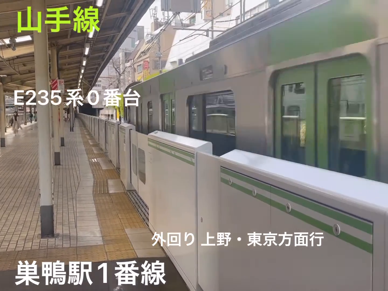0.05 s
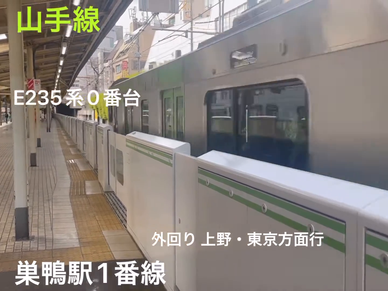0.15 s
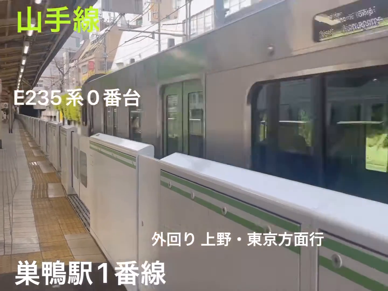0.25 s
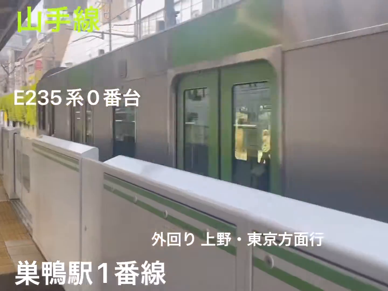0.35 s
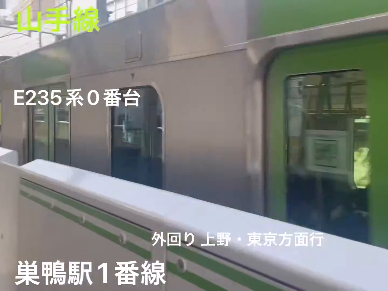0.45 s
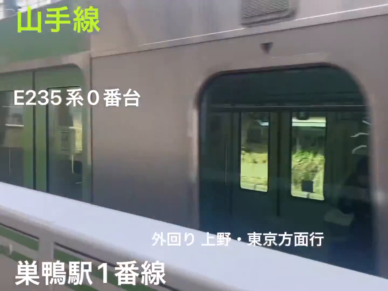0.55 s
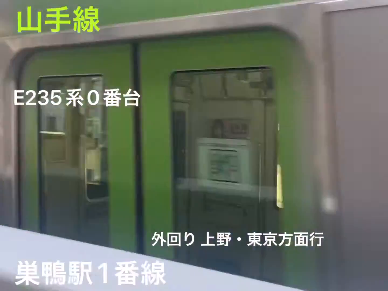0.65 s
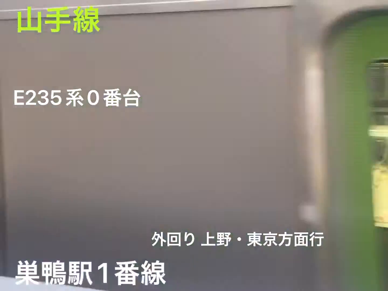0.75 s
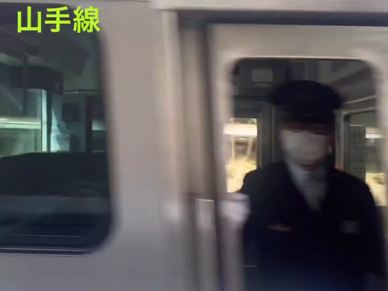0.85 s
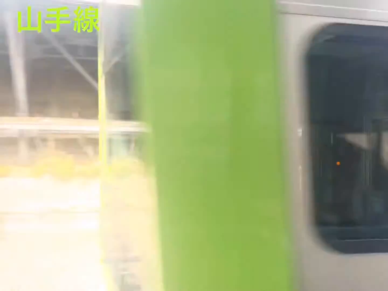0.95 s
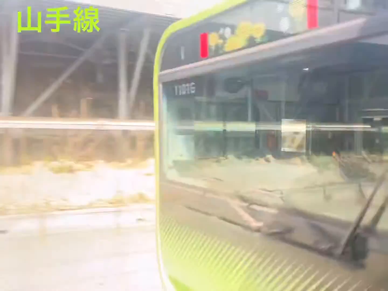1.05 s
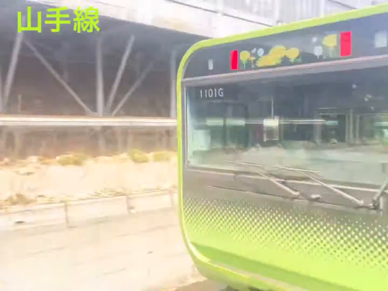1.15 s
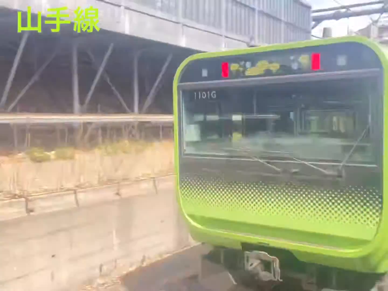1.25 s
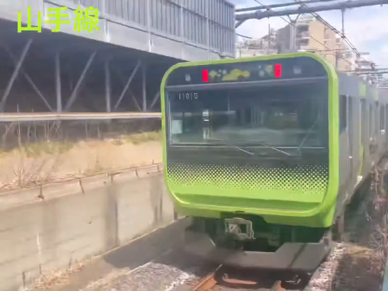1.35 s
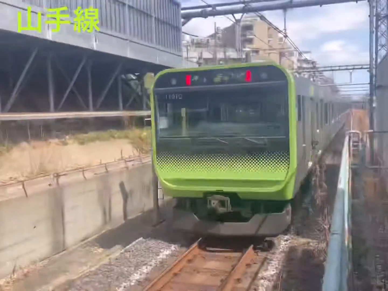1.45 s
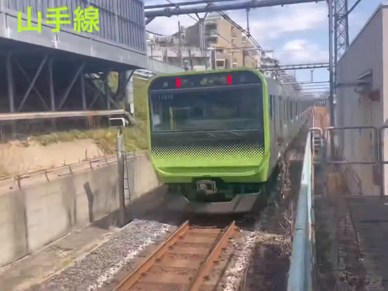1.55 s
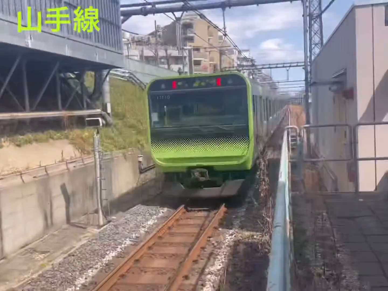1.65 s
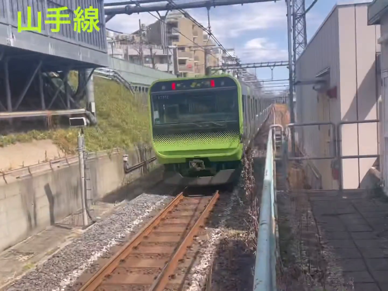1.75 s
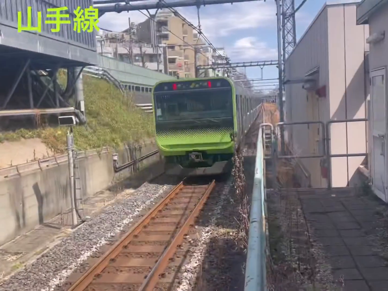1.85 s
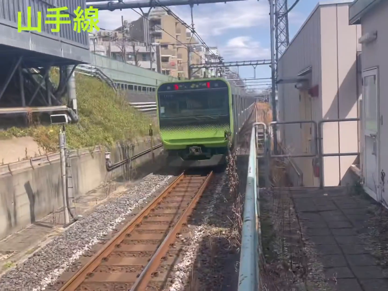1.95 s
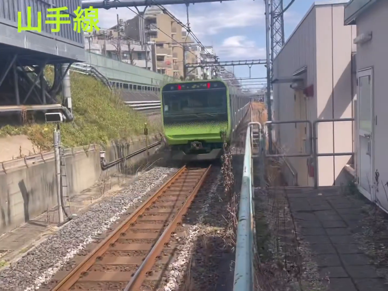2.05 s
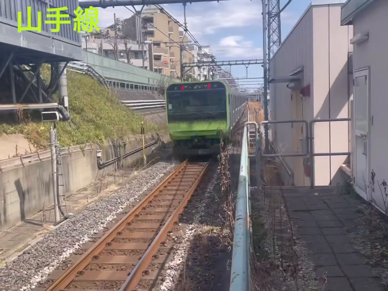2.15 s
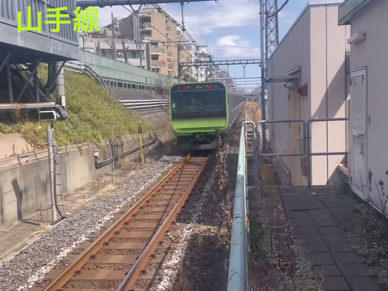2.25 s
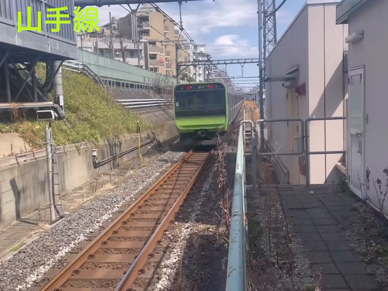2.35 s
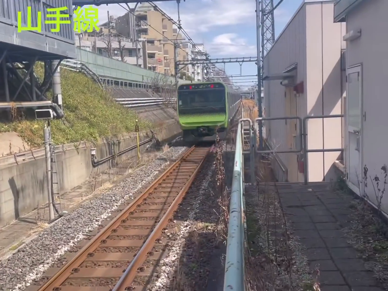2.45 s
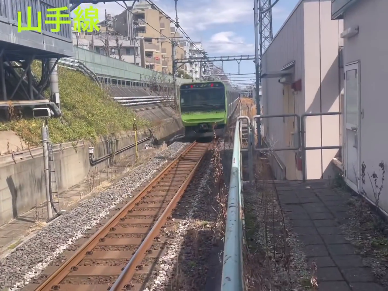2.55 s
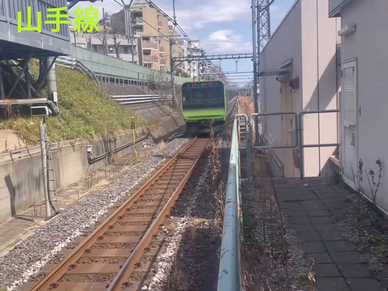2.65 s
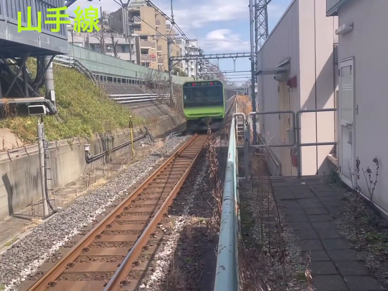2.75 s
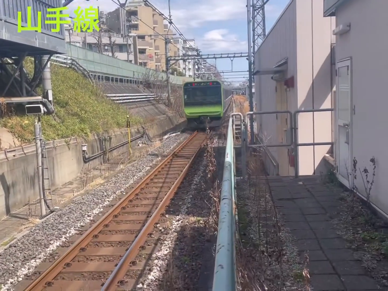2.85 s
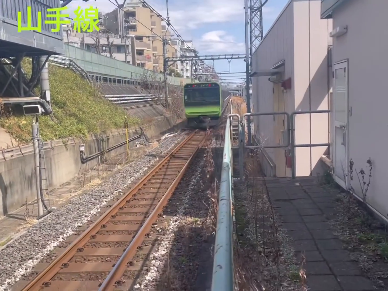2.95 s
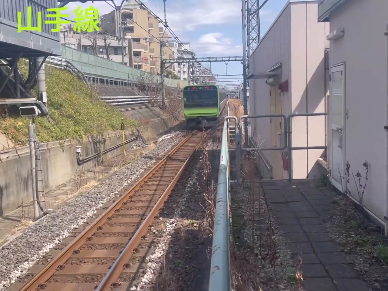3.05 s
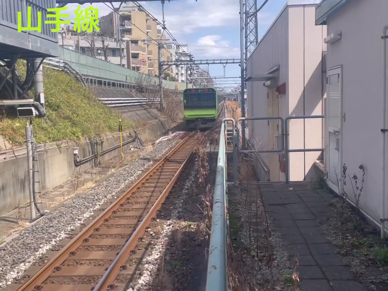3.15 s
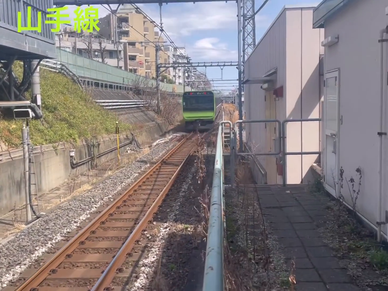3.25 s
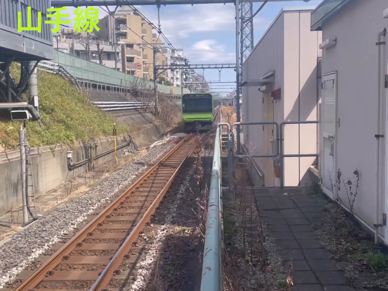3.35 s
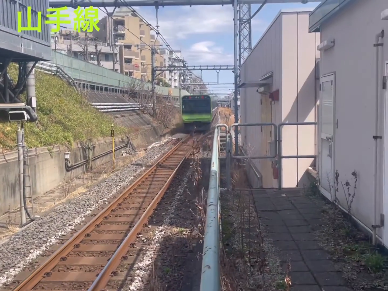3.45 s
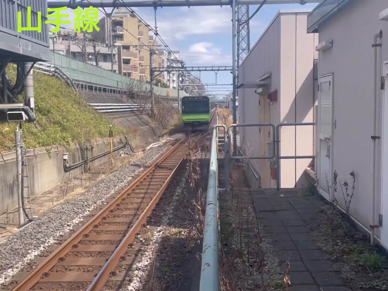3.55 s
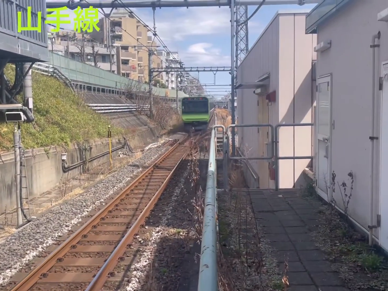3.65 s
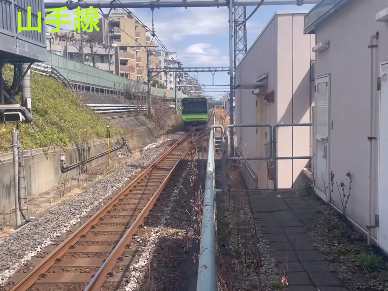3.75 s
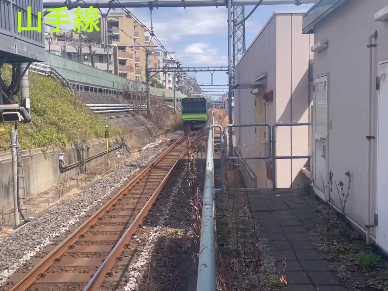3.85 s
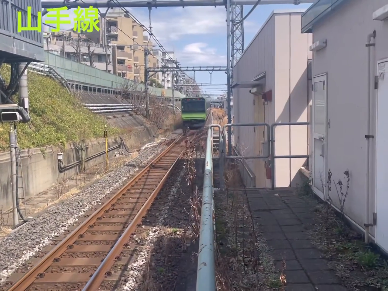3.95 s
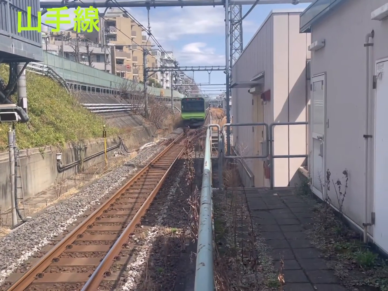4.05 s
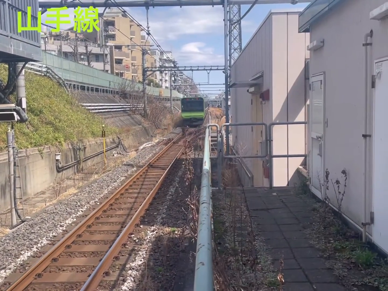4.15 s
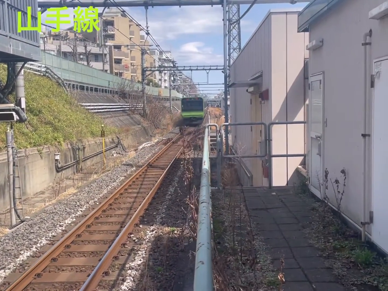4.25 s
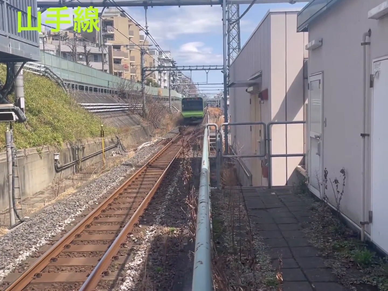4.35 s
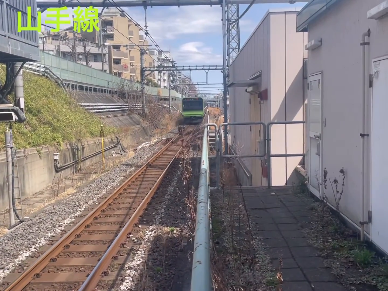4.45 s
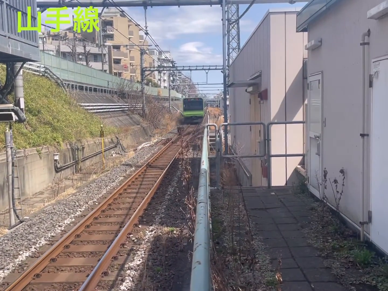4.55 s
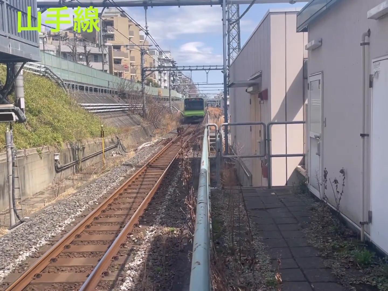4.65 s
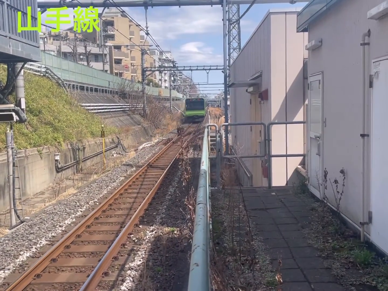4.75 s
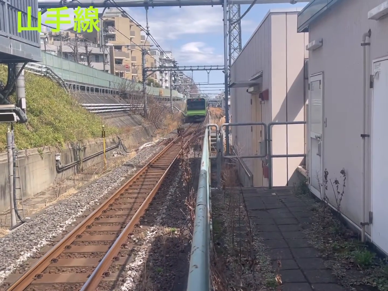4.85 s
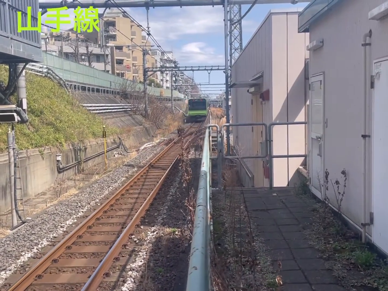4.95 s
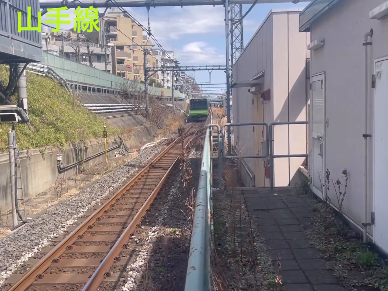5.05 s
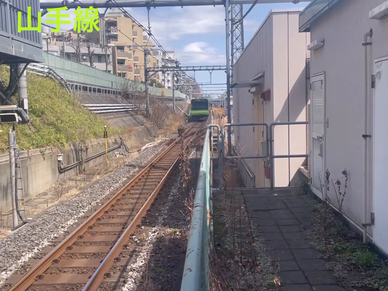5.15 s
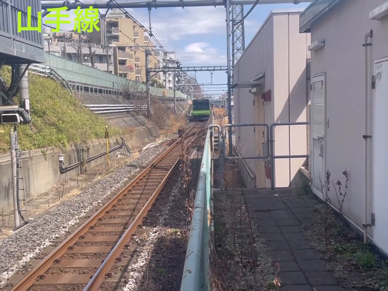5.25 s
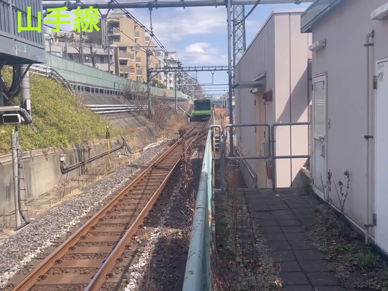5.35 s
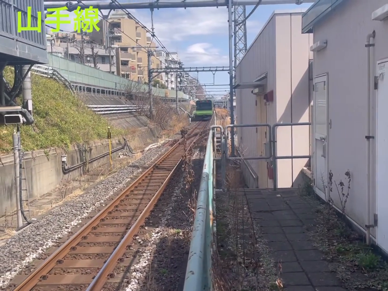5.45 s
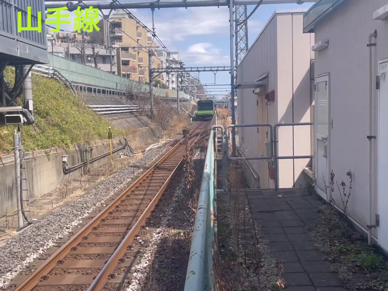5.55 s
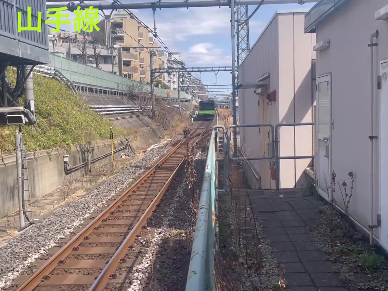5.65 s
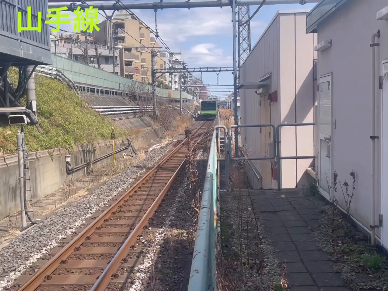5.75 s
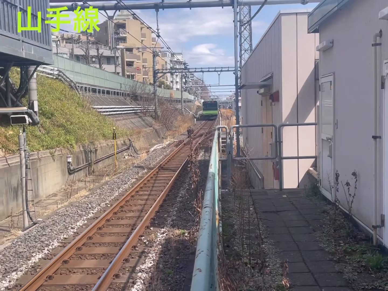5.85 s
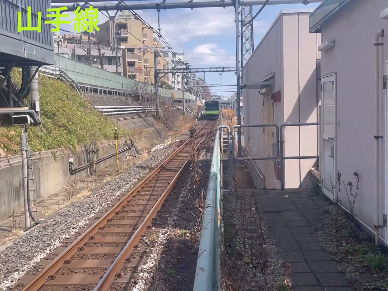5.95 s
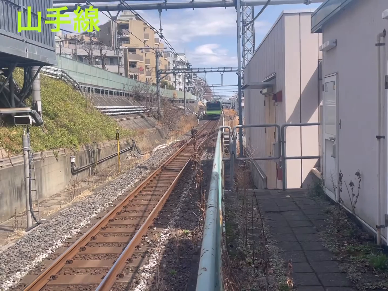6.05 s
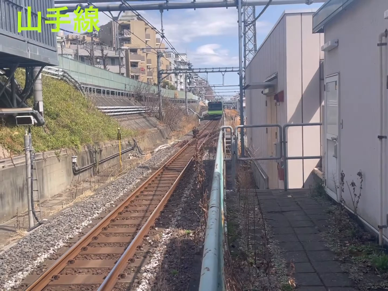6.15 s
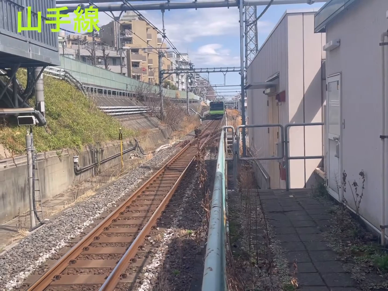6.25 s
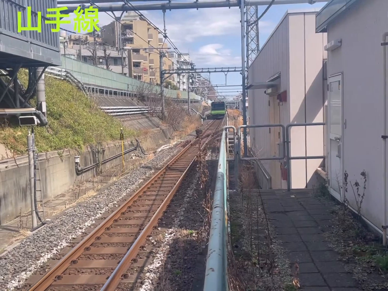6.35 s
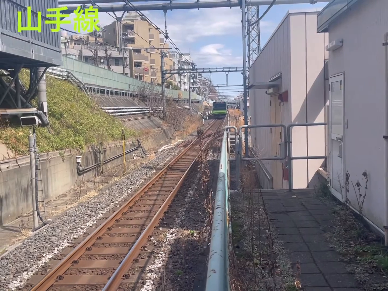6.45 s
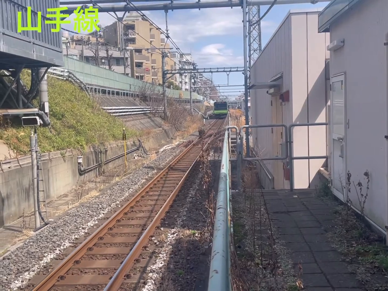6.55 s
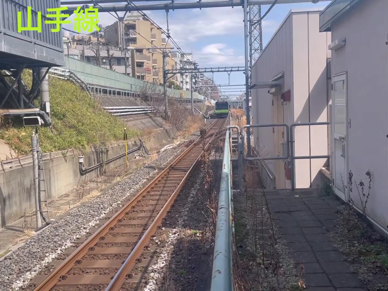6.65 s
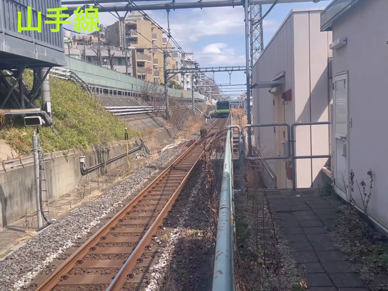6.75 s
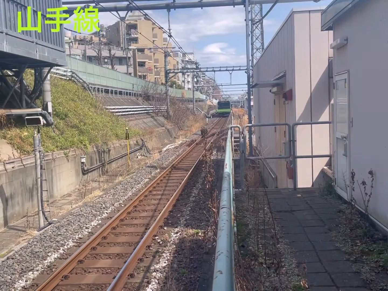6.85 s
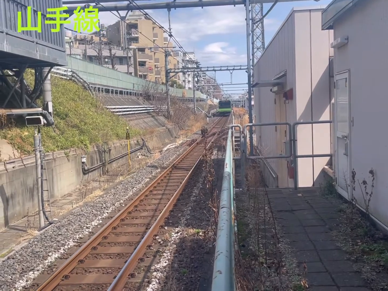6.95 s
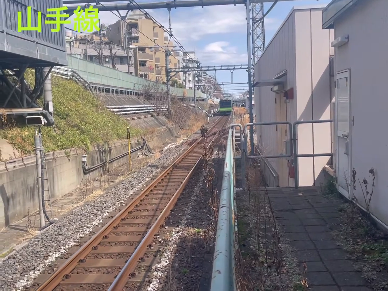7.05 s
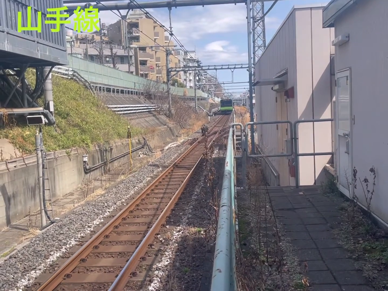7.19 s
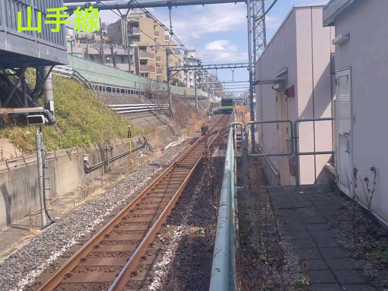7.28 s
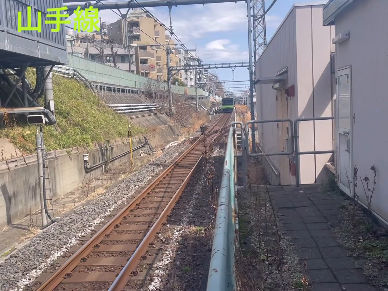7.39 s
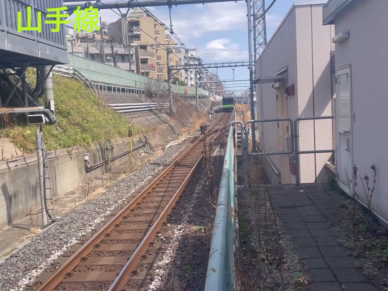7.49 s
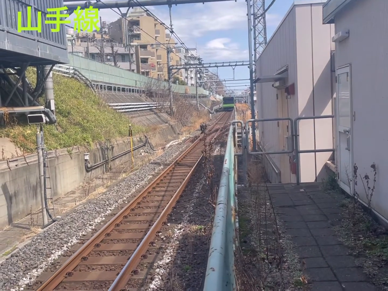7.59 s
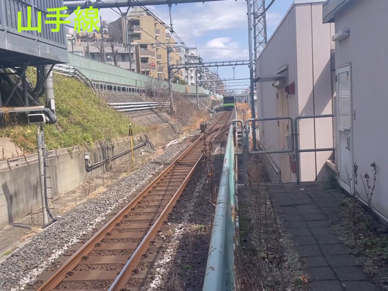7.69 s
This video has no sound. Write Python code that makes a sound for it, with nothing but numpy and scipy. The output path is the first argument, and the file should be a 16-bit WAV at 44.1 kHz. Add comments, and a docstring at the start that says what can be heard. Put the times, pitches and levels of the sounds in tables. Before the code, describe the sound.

From the end of a station platform, an electric train is heard passing several metres away, wide and loud, its wheels roaring and its running gear humming. After a brief thin squeal from the last wheels, a run of thumps, rail rings and a few clacks echoes lightly off the cutting walls. The rumble and whine grow narrower, lower and more distant, fading toward a low town drone and faint hiss.

```python
"""An electric train's last car rolls past the end of a platform, 8 m off, and away down a cutting.
Rough wheels on rough rails make a rumble and roar with a faint hiss above, and the running gear sings
in fuzzy lines, lower once it recedes. At rail joints the axles thump, ring the rail and clack.
Behind lie a low town drone and faint microphone hiss. From the platform, a camera's two microphone
ports hear the train wide while it is alongside and narrow once only its tail is in view."""
import sys
import numpy as np
from scipy import signal
from scipy.fft import rfft, irfft, next_fast_len
from scipy.io import wavfile
from scipy.ndimage import uniform_filter1d, map_coordinates

SR = 44100
rng = np.random.default_rng(int(sys.argv[2]) if len(sys.argv) > 2 else 0)


def wrap_up_sound(samples):
    """Save the sound to the file named by the first command line argument, as 16-bit audio."""
    columns = np.atleast_2d(samples).T
    # keep every value between -1 and 1, then stretch to whole-number steps
    tamed = np.clip(columns, -1, 1)
    steps = np.round(tamed * 32767).astype(np.int16)
    wavfile.write(sys.argv[1], SR, steps)


N = 340452

# rolling noise at the platform (time [s], ground rumble [dB], track boom [dB], rail roar [dB])
ROLLING_LEVELS = [(0, -30, -30, -27), (.2, -26.5, -27, -25.5), (.4, -34.5, -30.5, -25),
                  (.55, -33.5, -27.5, -25.5), (.68, -37, -28.5, -26.5), (.85, -37, -27, -28.5),
                  (1.1, -32.5, -27, -27.5), (1.5, -32, -32, -27), (1.75, -35, -30.5, -28.5),
                  (2.15, -36, -26, -34.5), (2.5, -34.5, -31, -29.5), (2.65, -46, -28, -29.5),
                  (2.8, -40, -22.5, -32.5), (3.05, -38, -27, -41), (3.3, -37, -31.5, -36.5),
                  (3.55, -27.5, -31, -42), (3.72, -40, -36, -42.5), (3.9, -38, -31, -39),
                  (4.05, -34, -32, -40), (4.2, -38, -36, -41.5), (4.4, -41.5, -39.5, -41),
                  (4.7, -37.5, -42, -41.5), (4.95, -32.5, -45.5, -44.5), (5.12, -39, -47, -47.5),
                  (5.3, -40.5, -49.5, -47.5), (5.7, -44, -46, -44), (6.1, -51, -49, -48.5),
                  (6.3, -45, -48, -47.5), (6.6, -43, -50, -48), (6.8, -48, -51.5, -49),
                  (7.1, -46, -50, -48.5), (7.4, -44, -51, -50), (7.72, -43, -51, -52)]
# colours of the rolling noise, deepest first (frequency [Hz], relative density [dB])
RUMBLE_SPECTRUM = [(25, -17), (45, 4), (65, 5.5), (100, -0.5), (150, -10.5), (250, -33), (500, -120)]
BOOM_SPECTRUM = [(30, -98), (60, -15.5), (120, -6), (200, -3), (290, -3), (330, -3), (380, -8.5),
                 (450, -19.5), (700, -48), (1400, -120)]
ROAR_SPECTRUM = [(150, -100), (300, -36), (480, 2), (600, -0.5), (760, 0.5), (900, -5.5), (1000, -10),
                 (1500, -17.5), (2400, -56), (5000, -120)]
HISS_SPECTRUM = [(450, -100), (900, -25), (1200, -11), (1900, -2), (2450, -7), (3300, -10.5), (5500, -14),
                 (8000, -21), (11000, -40), (16000, -98)]
AIR_SPECTRUM = [(2000, -96), (5000, -36), (7500, -1.5), (10000, -1.5), (13000, -6.5), (15000, -17),
                (15700, -24)]

# resonances of wheels, rails and car body, heard close by and from down the cutting
# (frequency [Hz], near width [Hz], near gain [dB], far width [Hz], far gain [dB])
BODY_LINE = [(293, 92, 0, 200, 0)]
LOW_LINES = [(444.5, 24.7, 0, 33, -11), (451.6, 25, -20, 26, 0)]
MIDDLE_LINES = [(879, 42, 11, 137, -7), (914, 30, -4, 22, 0), (857, 26, -4, 56, -2.5)]
UPPER_MID_LINES = [(1331, 25, 0, 68, -5), (1362, 60, -14, 57, 0)]
HIGH_LINES = [(1774, 48, 0.5, 93, -3.5), (2150, 160, 1, 91, 0.5), (2260, 100, -12.5, 95, -3.5)]
WHINE_LINES = [(2630, 90, 5.5, 43, -20), (2670, 85, -10, 50, 3.5), (2830, 340, -5, 430, -5.5)]
APPROACH_LINE = [(2722, 130, 0, 110, 0)]
TOP_LINES = [(3910, 300, -5, 310, 0), (4440, 110, -6, 62, -9)]
SQUEAL_LINES = [(4890, 120, 1, 130, 0), (5300, 98, -8, 110, -9)]
# how loudly they sing (time [s], low lines [dB], middle lines [dB], high lines [dB])
SINGING_LEVELS = [(0, -25.5, -26.5, -42.5), (.3, -25.5, -32.5, -42.5), (.45, -21, -32, -42),
                  (.6, -24.5, -32, -46), (.72, -33.5, -30.5, -41.5), (.92, -22.5, -28, -46),
                  (1.05, -28, -21, -39), (1.15, -25.5, -26.5, -44), (1.25, -24, -23, -38),
                  (1.4, -24, -28.5, -40), (1.5, -29.5, -26, -39), (1.62, -30, -32.5, -45),
                  (1.8, -30, -33, -49), (2.2, -30.5, -42, -52.5), (2.4, -28, -36.5, -46.5),
                  (2.56, -37, -44, -48), (2.75, -35.5, -42.5, -52), (2.95, -41.5, -44, -58),
                  (3.2, -40.5, -44, -52.5), (3.5, -42.5, -40.5, -54), (3.8, -44, -39.5, -54),
                  (4.1, -43, -41, -54.5), (4.2, -39, -41.5, -56), (4.32, -41.5, -42, -48.5),
                  (4.6, -44.5, -43, -50), (4.75, -44, -42.5, -53), (5.1, -40, -42.5, -52.5),
                  (5.4, -40.5, -43.5, -55), (5.75, -44.5, -44.5, -57.5), (6.1, -43.5, -45.5, -60),
                  (6.5, -44, -45.5, -59.5), (6.9, -43.5, -46, -61), (7.3, -49, -46.5, -60),
                  (7.72, -48.5, -45.5, -66)]
# the other lines, one table each (time [s], level [dB])
BODY_LEVEL = [(0, -43), (.8, -39), (1.15, -28), (1.75, -27.5), (2.1, -45), (2.8, -34), (3.5, -40.5),
              (4.5, -52), (7.72, -57.5)]  # hollow hum of the car body
UPPER_MID_LEVEL = [(0, -41), (.6, -46), (1.0, -49), (1.15, -40.5), (1.5, -40), (1.9, -46), (2.25, -47.5),
                   (2.5, -54.5), (3.4, -54.5), (4.4, -54.5), (5.4, -55.5), (6.3, -58.5), (7.72, -59)]
WHINE_LEVEL = [(0, -41.5), (.3, -47), (.9, -49), (1.1, -48), (1.22, -37.5), (1.32, -38), (1.45, -36),
               (1.6, -43), (1.78, -59), (2.2, -54.5), (2.45, -51), (3, -58), (3.25, -62), (3.45, -57.5),
               (3.9, -55.5), (4.15, -61), (4.25, -55), (4.5, -54), (4.7, -54.5), (5.05, -53.5),
               (5.25, -58.5), (5.85, -59), (6.2, -62), (7.72, -78)]  # metallic whine
APPROACH_LEVEL = [(0, -40), (.2, -50), (.4, -44), (.9, -43.5), (1.1, -52), (1.3, -62), (7.72, -100)]  # whine of wheels still approaching
TOP_LEVEL = [(0, -51), (.8, -54), (1.15, -49), (1.5, -56), (1.8, -66), (2.3, -62), (3.2, -69), (4.4, -63),
             (5.6, -64.5), (6.3, -69.5), (7.72, -67)]
SQUEAL_LEVEL = [(0, -61), (.9, -63), (1.17, -46), (1.35, -51), (1.46, -50), (1.62, -66), (1.8, -70),
                (7.72, -100)]  # thin squeal of the last wheels
# share of the far sound (time [s], all lines but the metallic whine [0-1], metallic whine [0-1])
FAR_SHARE = [(0, 0.03, .02), (1.7, 0.13, 0.11), (3, 0.9, .2), (3.9, 0.97, .3), (4.3, 0.9, 0.87),
             (7.72, 0.78, 0.97)]

# steady background: low town drone plus faint microphone hiss (frequency [Hz], relative density [dB])
BACKGROUND_SPECTRUM = [(40, 0), (70, 1.5), (300, -9.5), (900, -16), (1500, -22), (3000, -25.5), (6500, -67),
                       (9000, -38.5), (12000, -36), (15700, -33)]

# axles dropping on joints (time [s], relative level [dB], settled pitch [Hz], t60 [s])
THUMPS = [(0.599, -18, 125, 0.12), (.718, -10.5, 91, 0.082), (0.746, -10, 127, 0.071),
          (.94, -8.5, 231, 0.061), (1.179, -10.5, 94, 0.048), (1.877, -16, 115, 0.093),
          (1.988, -15.5, 286, 0.083), (2.276, -13, 282, 0.072), (2.306, -11, 301, 0.13),
          (2.349, -15, 201, .06), (2.401, -3, 291, 0.066), (2.453, -1, 293, 0.061),
          (2.484, -17.5, 302, 0.075), (2.518, -15, 283, 0.044), (2.679, -10, 120, 0.072),
          (2.7, -13, 211, 0.087), (2.773, -12, 305.5, 0.1), (2.814, -3.5, 243, 0.052),
          (2.83, -10.5, 285, 0.072), (2.904, -13.5, 300, 0.083), (2.97, -7, 237, 0.06),
          (3.046, -12, 153, 0.079), (3.129, -11.5, 179, 0.079), (3.159, -11, 151, 0.052),
          (3.22, -15, 152, 0.074), (3.283, -14, 233, 0.047), (3.427, -13.5, 91, 0.1),
          (3.485, -11.5, 148, 0.043), (3.533, -16, 109, .045), (3.612, -13, 137, 0.08),
          (3.753, -13, 247, 0.051), (3.84, -16.5, 340, 0.047), (3.845, -13.5, 253, 0.032),
          (3.858, -11, 140, 0.06), (3.959, -5, 132, 0.036), (3.962, -17, 403, 0.042),
          (4.01, -12.5, 111, 0.055), (4.086, -22, 118, 0.057), (4.238, -14, 172, 0.038),
          (4.401, -21.5, 118, .077), (4.491, -14, 86.6, 0.081), (4.728, -15, 69, 0.031),
          (5.008, -11.5, 66, 0.066), (5.048, -16.5, 103, 0.042), (5.099, -20, 81, 0.067),
          (6.269, -23, 112, 0.071), (6.341, -18.5, 61, .077), (6.502, -27, 71.5, 0.091),
          (6.589, -21, 72, 0.061)]
# joints that ring the rail (time [s], relative level [dB], tilt to the upper modes [dB/octave])
RAIL_STRIKES = [(1.073, -9, -6), (1.19, -13, -6), (1.225, -7.5, 3), (1.279, -21, 0), (1.524, -13.5, 2),
                (1.596, -12.5, 2), (1.84, -15, 4), (2.276, -10.5, -9), (2.33, -14.5, 5), (2.387, -5, 8.5),
                (2.398, -11, -3), (2.477, -20.5, -1), (2.515, -18, -2), (2.61, -16, 3), (2.659, -13, 5),
                (2.77, -21, -9)]
# modes of the rail (frequency [Hz], gain [dB], t60 [s])
RAIL_MODES = [(433.4, -0.5, 0.23), (504.4, -5, 0.46), (561, 7, 0.045), (602, -12, 0.26), (658, -6.5, 0.38),
              (707, -2.5, 0.22), (777, -9, 0.26)]
# joints heard through the air (time [s], relative clack level [dB], relative wheel ring level [dB])
CLACKS = [(2.313, -29.5, -27), (2.431, -30.5, -38), (2.85, -39.5, -55), (2.969, -44, -56),
          (3.859, -40.5, -50), (3.9657, -39, -28.5)]
# colours of the clack and of the wheel ringing after it (frequency [Hz], relative density [dB])
CLACK_SPECTRUM = [(400, -100), (800, -35), (1800, -1.5), (2400, -4), (3800, -10), (4500, -6.5),
                  (5200, -9.5), (8000, -8.5), (12000, -12.5), (15000, -48)]
PING_SPECTRUM = [(1500, -64), (1880, -18), (2020, -3), (2160, -12), (2600, -60)]

# left-right likeness of the sound before spread, with treble bands almost fully alike,
# as in compressed audio (frequency [Hz], likeness [0-1])
STEREO_LIKENESS = [(60, .96), (300, .88), (1000, .2), (2200, .5), (4000, .75), (7000, .6), (7700, .995),
                   (8900, .995), (9700, .7), (10500, .99), (12400, .99), (13200, .6), (14000, .995)]
# phase shift of the microphone housing (frequency [Hz], left lead [rad])
PORT_LEAD = [(60, 0), (700, .4), (1700, -.8), (2800, .7), (4000, .1), (5000, .6), (6500, -.6),
             (7700, -3.14), (8900, -3.14), (10500, -6.28), (12500, -6.28), (14000, -9.42)]
# level shift of the housing, before spread (frequency [Hz], left minus right [dB])
PORT_BALANCE = [(200, 0), (900, 2), (1400, 0.5), (2800, 3.5), (4800, 5.5), (6200, 0.5), (7800, 0.5),
                (14000, 0.5)]
# the cars as seen from the microphone (time [s], share of the view filled [0-1])
ALONGSIDE = [(0, 0.9), (.7, 1), (1, 0.08), (7.72, 0)]

PASS_S, TAIL_S = 1.16, 0.21  # when the tail goes by, half-width of its swell
SPEED_M_S, TRACK_DISTANCE_M = 16.3, 8.03
RECEDING_RATIO = 0.96  # pitch once the car runs straight away
STEADINESS = .6  # how evenly a line drones, 0-1
CLACK_T60_S, WALLS_T60_S, WALLS_DB = 0.097, 0.94, -6.5
PING_RISE_S, PING_T60_S = 0.044, 0.22
JOINT_TIME = np.arange(SR // 3) / SR  # seconds since a wheel hit a joint
LOW_CUT_HZ, TOP_HZ = 30, 15750


def amp(db):
    """Gain of a level in dB."""
    return 10 ** (np.asarray(db) / 20)


def unit(x):
    """x at rms 1."""
    return x / np.sqrt(np.mean(x ** 2) + 1e-20)


def along(points, hz):
    """Read (frequency, value) points at hz on a log axis."""
    f, v = np.transpose(points)
    return np.interp(np.log(hz + 1), np.log(f + 1), v)


def curves(rows):
    """One value per sample for each column after the time."""
    times, *columns = np.transpose(rows)
    return [np.interp(np.arange(N) / SR, times, column) for column in columns]


def wobble(rate):
    """A smooth random curve, rate knots a second."""
    steps = np.arange(0, N + 64, 64)
    knots = rng.standard_normal(int(N * rate / SR) + 4)
    return np.interp(np.arange(N), steps, map_coordinates(knots, [steps * rate / SR]))


def filtered(x, response):
    """x times a response of frequency."""
    size = next_fast_len(x.shape[-1] + 8192)
    return irfft(rfft(x, size) * response(np.fft.rfftfreq(size, 1 / SR)), size)[..., :x.shape[-1]]


def coloured(noise, spectrum):
    """Noise given a colour, rms 1."""
    return unit(filtered(noise, lambda hz: amp(along(spectrum, hz))))


def add(track, start_s, sound):
    """Mix a sound in at start_s."""
    part = track[:, round(start_s * SR):][:, :sound.shape[-1]]
    part += sound[..., :part.shape[1]]


def patchy_noise(depth_db):
    """Two unrelated white noises with shared patches of random gain in time and frequency."""
    cells = signal.stft(rng.standard_normal((2, N)), nperseg=512)[2]
    patches = uniform_filter1d(rng.standard_normal(cells.shape[1:]), size=5, axis=0)
    patches = uniform_filter1d(patches, size=10, axis=1)
    return signal.istft(cells * amp(depth_db * unit(patches)), nperseg=512)[1][:, :N]


def passing_db(near_db, loss_db, tail_db):
    """Level at the microphone: swells as the open tail goes by, drops loss_db per doubled distance."""
    t = np.arange(N) / SR - PASS_S
    doublings = np.log2(np.hypot(1, SPEED_M_S * np.maximum(t, 0) / TRACK_DISTANCE_M))
    return near_db - loss_db * doublings + tail_db * np.exp(-(t / TAIL_S) ** 2)


def rolling():
    """Rough wheels on rough rails shake the ground, the track and the air."""
    rumble_db, boom_db, roar_db = curves(ROLLING_LEVELS)
    hiss_db = passing_db(near_db=-38, loss_db=7.38, tail_db=2.7)
    air_db = passing_db(near_db=-58.5, loss_db=4.6, tail_db=8.3)
    grind = patchy_noise(depth_db=2.0)
    jolts = wobble(11)  # uneven track jolts every band a little
    drift = wobble(4.66)  # the treble swells slowly
    rumble = amp(rumble_db + wobble(8.4) + 0.5 * jolts) * coloured(grind, RUMBLE_SPECTRUM)
    boom = amp(boom_db + 1.27 * wobble(13) + 0.26 * jolts) * coloured(grind, BOOM_SPECTRUM)
    roar = amp(roar_db + 0.12 * jolts) * coloured(grind, ROAR_SPECTRUM)
    hiss = amp(hiss_db + 0.25 * jolts + 0.2 * drift) * coloured(grind, HISS_SPECTRUM)
    air = amp(air_db + 0.47 * jolts + .8 * drift) * coloured(grind, AIR_SPECTRUM)
    return rumble + boom + roar + hiss + air


def fuzzy_tone(noise_spectrum, hz, width_hz, gain_db):
    """Noise through steep resonances, its slow fades partly flattened, rms 1."""
    f = np.linspace(0, SR / 2, noise_spectrum.shape[1])
    peaks = np.sum(amp(gain_db) / (1 + (2 * (f - hz) / width_hz) ** 2), axis=0)
    tone = irfft(noise_spectrum * peaks, next_fast_len(N))[:, :N]
    power = np.abs(uniform_filter1d(unit(tone) ** 2, size=4096, axis=1))
    return unit(tone * (power + .05) ** (-STEADINESS / 2))


def singing(waver_db=1):
    """Wheels, rails and body resonate; each near tone crossfades to a lower one as the car recedes."""
    noise_spectrum = rfft(rng.standard_normal((4, next_fast_len(N))))
    away, whine_away = curves(FAR_SHARE)
    low_db, middle_db, high_db = curves(SINGING_LEVELS)
    voices = [(LOW_LINES, low_db, away),
              (MIDDLE_LINES, middle_db, away),
              (HIGH_LINES, high_db, away),
              (WHINE_LINES, *curves(WHINE_LEVEL), whine_away),
              (TOP_LINES, *curves(TOP_LEVEL), away),
              (BODY_LINE, *curves(BODY_LEVEL), away),
              (SQUEAL_LINES, *curves(SQUEAL_LEVEL), away),
              (APPROACH_LINE, *curves(APPROACH_LEVEL), away),
              (UPPER_MID_LINES, *curves(UPPER_MID_LEVEL), away)]
    out = np.zeros((2, N))
    for lines, db, far_share in voices:
        hz, near_width, near_db, far_width, far_db = np.transpose(lines)[:, :, None]
        near = fuzzy_tone(noise_spectrum[:2], hz, near_width, near_db)
        far = fuzzy_tone(noise_spectrum[2:], hz * RECEDING_RATIO, far_width, far_db)
        blend = np.sqrt(1 - far_share) * near + np.sqrt(far_share) * far
        out += amp(db + waver_db * wobble(5)) * blend
    return out


def background():
    """A steady low town drone plus the microphone's own faint hiss."""
    return amp(-44.5) * coloured(rng.standard_normal((2, N)), BACKGROUND_SPECTRUM)


def axle_thumps():
    """An axle on a joint thumps the ground, and the cutting walls roll the sound back."""
    out, t = np.zeros((2, N)), JOINT_TIME
    for start_s, db, hz, t60 in THUMPS:
        swell = (1 - np.exp(-t / (0.15 * t60))) ** 2  # a short thump also comes on faster
        sagging_hz = hz * (1 + 0.23 * np.exp(-t / 0.0048))  # the pitch falls as the track gives
        thump = np.sin(2 * np.pi * np.cumsum(sagging_hz) / SR) * amp(db + 10.5 - 60 * t / t60) * swell
        walls = rng.standard_normal((2, len(t))) * amp(-60 * t / .3) * (t > .02)
        echo = signal.fftconvolve(thump[None], walls / np.linalg.norm(walls[0]), axes=1)
        add(out, start_s, thump * [[1], [.3]])  # mostly in the part left and right share
        add(out, start_s, amp(-12.5) * echo)
    return out


def rail_rings(detune=.02):
    """A wheel strikes the rail's modes; every joint rings a little differently."""
    out, t = np.zeros((2, N)), JOINT_TIME
    hz, mode_db, t60 = np.transpose(RAIL_MODES)[:, :, None]
    attack = 1 - np.exp(-t / 0.004)
    for start_s, db, tilt_db in RAIL_STRIKES:
        force, phase, tuning = np.split(rng.standard_normal((2, len(hz), 3)), 3, axis=2)
        struck_db = mode_db + tilt_db * np.log2(hz / hz.mean()) + 2 * force
        tones = np.sin(2 * np.pi * hz * (1 + detune * tuning) * t + 2 * phase)
        modes = amp(struck_db - 60 * t / t60) * tones
        add(out, start_s, amp(db - 8.5) * modes.sum(axis=1) * attack)
    return out


def joint_clacks():
    """A joint's clack comes through the air, smeared by the walls, and the wheel rings after it."""
    out, t = np.zeros((2, N)), JOINT_TIME
    attack = (1 - np.exp(-t / 0.005)) ** 2
    decay = amp(-60 * t / CLACK_T60_S) + amp(WALLS_DB - 60 * t / WALLS_T60_S)
    ping_shape = (1 - np.exp(-t / PING_RISE_S)) ** 2 * amp(-60 * t / PING_T60_S)
    for start_s, clack_db, ping_db in CLACKS:
        loss_db_per_hz = 0.77 * (start_s - 1) / 1000  # air dulls the far ones
        noise = rng.standard_normal((2, len(t)))
        clack = unit(filtered(noise, lambda hz: amp(along(CLACK_SPECTRUM, hz) - loss_db_per_hz * hz)))
        add(out, start_s, amp(clack_db - 6.0) * attack * decay * clack)
        ping = coloured(rng.standard_normal((2, len(t))), PING_SPECTRUM)
        add(out, start_s, amp(ping_db) * ping_shape * ping)
    return out


def stereo_image(pair, spread):
    """Left and right share pair[0] and differ in pair[1]; the housing shifts level and phase."""
    def response(hz):
        likeness = along(STEREO_LIKENESS, hz) ** np.where(hz < 7000, spread, 1)
        angle = np.arccos(likeness) / 2
        mix = np.array([[np.cos(angle), np.sin(angle)], [np.cos(angle), -np.sin(angle)]])
        housing = amp(along(PORT_BALANCE, hz) / spread / 2) * np.exp(.5j * along(PORT_LEAD, hz))
        return mix * np.array([housing, 1 / housing])[:, None]
    return filtered(pair[None], response).sum(axis=1)


def scene():
    """From the platform's end: a wide source while the cars pass, a narrow one behind the tail."""
    pair = rolling() + singing() + axle_thumps() + rail_rings() + joint_clacks() + background()
    alongside, = curves(ALONGSIDE)
    wide = stereo_image(pair, spread=2.33)
    narrow = stereo_image(pair, spread=0.92)
    return alongside * wide + (1 - alongside) * narrow


def record(dry):
    """The camera drops the deepest bass and keeps nothing above its band limit."""
    return filtered(dry, lambda hz: (hz < TOP_HZ) * hz ** 4 / (hz ** 4 + LOW_CUT_HZ ** 4))


dry = scene()
out = record(dry)
wrap_up_sound(out)
```